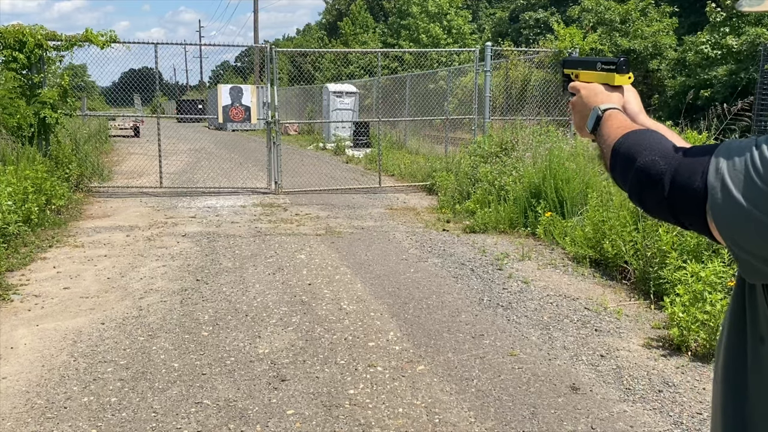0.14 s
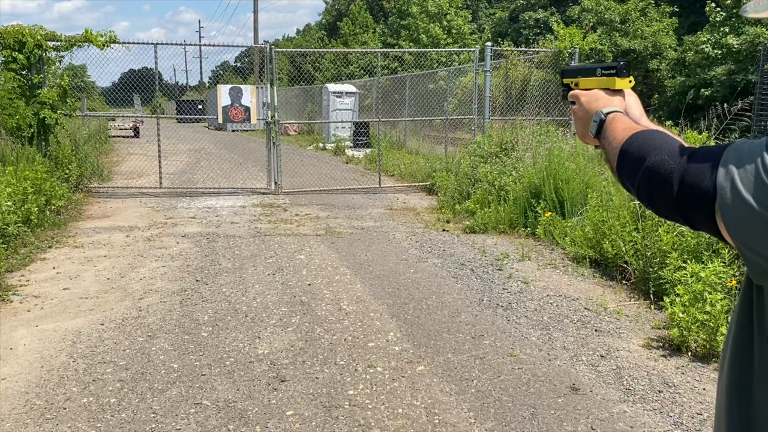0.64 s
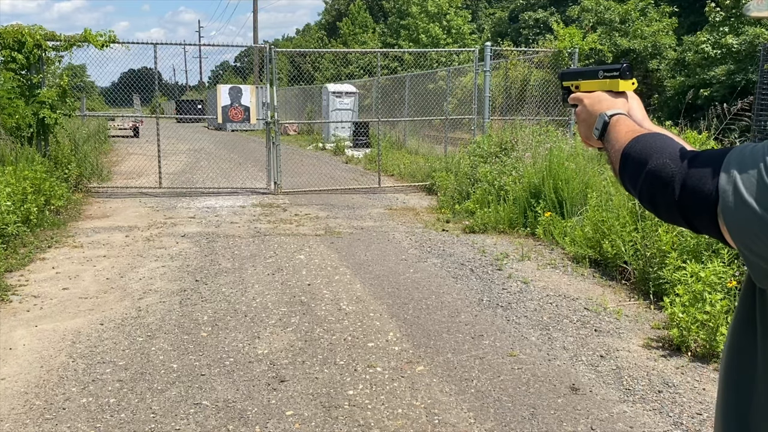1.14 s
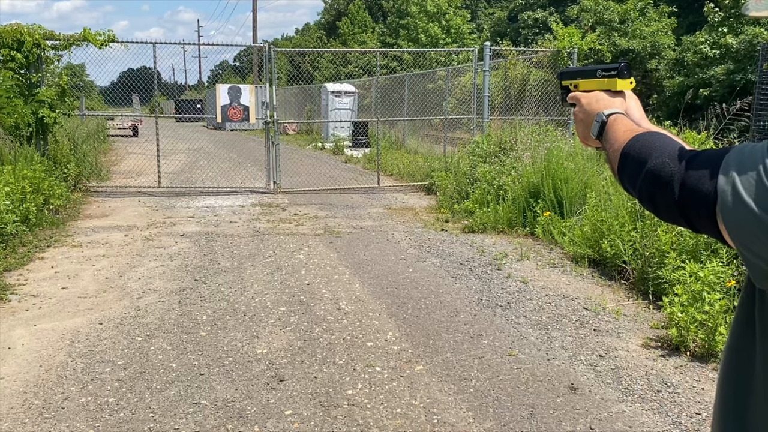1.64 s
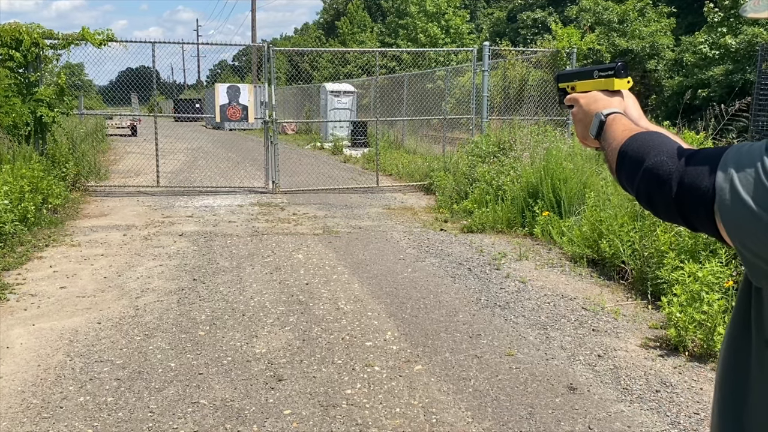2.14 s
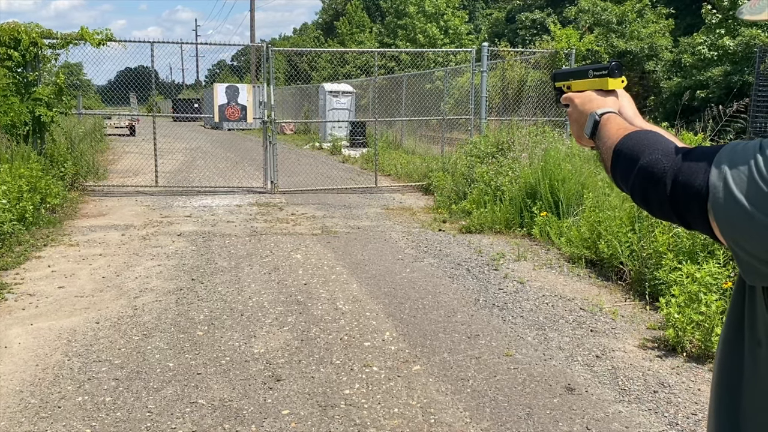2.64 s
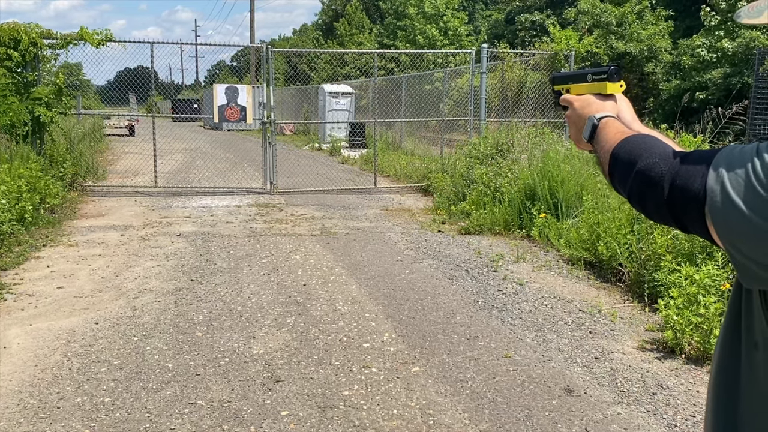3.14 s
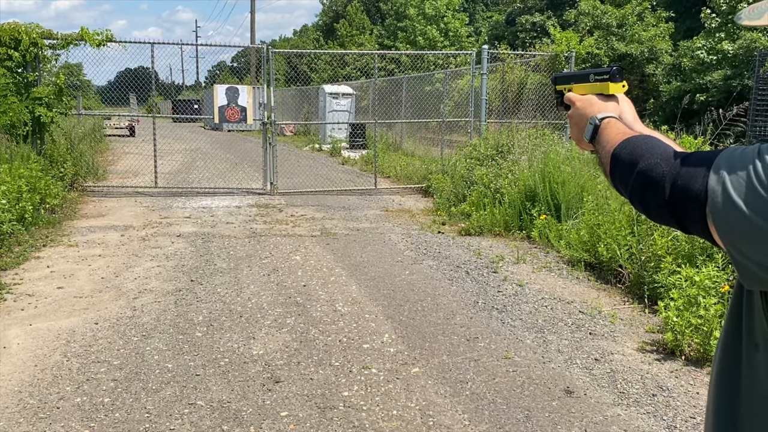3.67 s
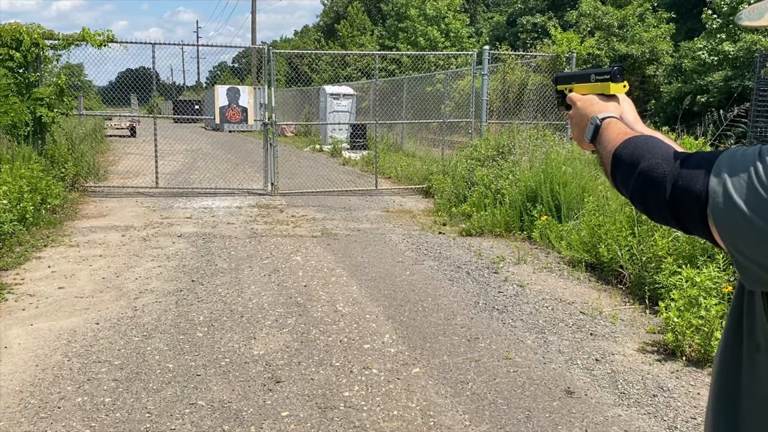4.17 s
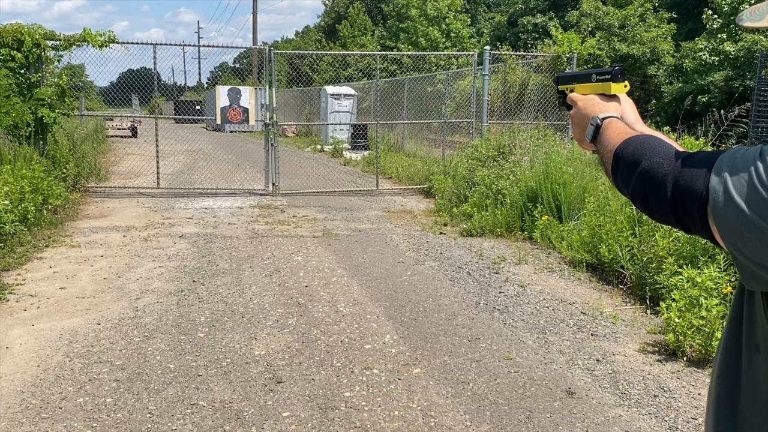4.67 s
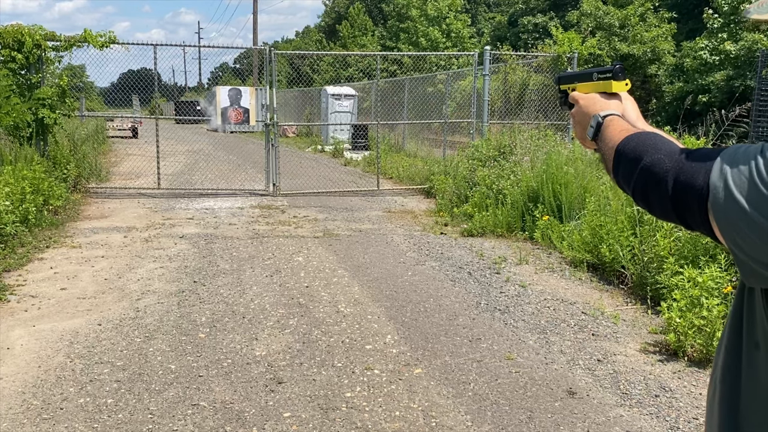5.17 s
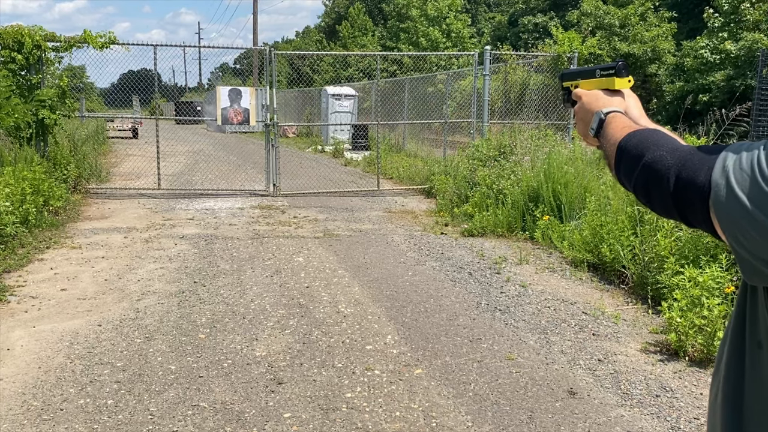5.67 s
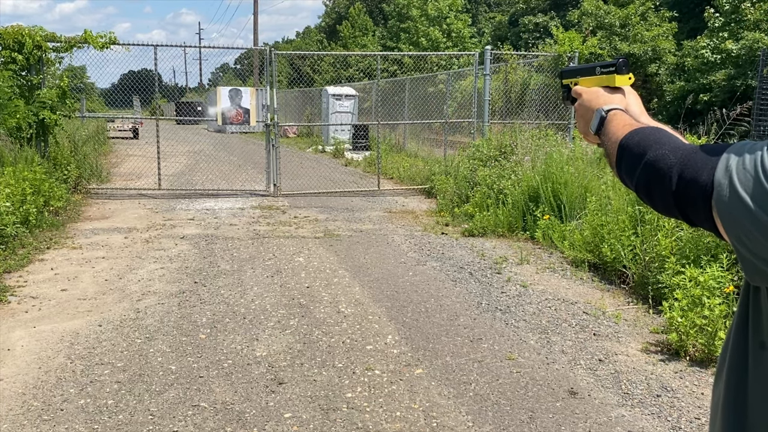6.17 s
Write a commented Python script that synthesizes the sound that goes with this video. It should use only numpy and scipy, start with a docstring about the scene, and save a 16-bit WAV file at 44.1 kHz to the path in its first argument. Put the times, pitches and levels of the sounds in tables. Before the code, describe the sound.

Birdsong over faint wind and far traffic, broken late by three loud compressed-gas pops, each ball smacking a board downrange, echoing off trees.

```python
"""An open gravel range in stereo: far road rumble, light wind on the microphone, leaves and insects are shaped noise.
Small ticks, filtered grit, dot the first seconds; gliding sines make two far bird calls, then a songbird.
A far engine's band of noise swells twice. From 4.8 s a compressed-gas launcher fires three times: hiss, knocks, gas slug.
Each ball bursts on a board downrange, cracks striking its ringing modes, about 0.14 s after its shot.
Ground, board and sheds return filtered copies of the shots; shots and hits die away in noise tails of the trees."""
import sys
import numpy as np
from scipy import signal
from scipy.fft import rfft, irfft
from scipy.io import wavfile
from scipy.ndimage import uniform_filter1d

SR = 44100
rng = np.random.default_rng(int(sys.argv[2]) if len(sys.argv) > 2 else 0)


def gain_from_db(level_db):
    """Convert decibel levels to linear amplitude factors (20 dB per decade)."""
    decades = np.asarray(level_db, float) / 20
    return 10 ** decades


def to_wav(sig):
    """Store sig (one row per channel, or 1-D mono) as 16-bit WAV at the path in sys.argv[1].

    Samples outside -1..1 are clipped; the rate is SR.
    """
    pcm = np.clip(np.atleast_2d(sig), -1, 1) * 32767
    pcm = np.round(pcm).astype(np.int16)
    wavfile.write(sys.argv[1], SR, pcm.T)  # frames by channels


N = 278129

# the launcher's shots: firing_s, level_db, bass_change_db
SHOTS = [(4.8176, -8.5, 0), (5.3871, -9, -1), (5.9153, -9, -7)]
# balls striking the board: start_s, level_db
HITS = [(4.9605, -11.5), (5.5268, -14.5), (6.0552, -17)]


def at_hz(points, hz, column=1):
    """Read one column of a table on a log-frequency axis."""
    points = np.array(points)
    return np.interp(np.log(hz + 1), np.log(points[:, 0]), points[:, column])


def in_time(rows):
    """Draw a level curve of (s, dB) points at every sample."""
    s, level_db = np.transpose(rows)
    return np.interp(np.arange(N) / SR, s, level_db)


def drift(rate):
    """Wander in straight lines between chance values of spread 1, rate of them a second (60 at most)."""
    knots = rng.standard_normal(int(N / SR * 60) + 2)
    return np.interp(np.arange(N) / SR * rate, np.arange(len(knots)), knots)


def stereo_noise(spectrum, alike, left_lag, size):
    """Coloured noise of rms 1; the part both sides share comes left_lag samples late on the left."""
    hz = np.fft.rfftfreq(size, 1 / SR)
    shared, left, right = rfft(rng.standard_normal((3, size))) * gain_from_db(at_hz(spectrum, hz))
    shared_gain, own_gain = np.sqrt(np.clip([alike, 1 - alike], 0, 1))
    late = shared * np.exp(-2j * np.pi * hz * left_lag / SR)
    x = irfft([shared_gain * late + own_gain * left, shared_gain * shared + own_gain * right], size)
    return x / np.sqrt(np.mean(x ** 2))


def ring(clicks, hz, t60):
    """A two-pole resonator: a unit click starts a sine of height 1 that falls 60 dB in t60 seconds."""
    r, w = gain_from_db(-60 / (t60 * SR)), 2 * np.pi * hz / SR
    return signal.lfilter([0, np.sin(w)], [1, -2 * r * np.cos(w), r * r], clicks + 1e-18)


def band(x, low_hz, high_hz):
    """Gentle band-pass."""
    sos = signal.butter(2, [low_hz, min(high_hz, .45 * SR)], "band", fs=SR, output="sos")
    return signal.sosfilt(sos, x)


def add(out, s, x):
    """Mix x into out from time s on."""
    i = round(s * SR)
    out[..., i:i + x.shape[-1]] += x[..., :N - i]


def convolve(x, response):
    """Pass x through an impulse response."""
    return signal.fftconvolve(np.atleast_2d(x), np.atleast_2d(response), axes=1)[:, :N]


def road():
    """Far traffic rumble: low noise, nearly the same on both sides."""
    # rumble spectrum: frequency_hz, density_db
    rumble = [(76, -47), (130, -6.5), (193, -2.5), (270, -8), (379, -8), (446, -13.5), (536, -12),
              (900, -16.5), (1150, -32.5), (1690, -43), (2860, -120)]
    return gain_from_db(-62.5 + 1.5 * drift(10)) * stereo_noise(rumble, 0.97, -18.0, size=N)


def drone():
    """A far engine: a narrow band of low noise that swells twice and flutters."""
    # engine spectrum: frequency_hz, density_db
    engine = [(200, -35), (290, -7.5), (350, 4), (430, -3.5), (600, -49)]
    # swells: centre_s, rise_db, half_length_s
    swells = [(2.08, 15, 0.33), (4.746, 11.5, 0.36)]
    t = np.arange(N) / SR
    level_db = -73.5 + 3.8 * drift(18)
    for centre_s, rise_db, half_s in swells:
        level_db += rise_db * np.exp(-((t - centre_s) / half_s) ** 2)
    return gain_from_db(level_db) * stereo_noise(engine, 0.79, -27.5, size=N)


def wind():
    """Lumpy low noise of wind on the microphone; one gust thumps the ports with a brief low sine."""
    # wind level: time_s, level_db
    strength = [(0.0, -60.5), (0.67, -57.5), (1.42, -53), (2.6, -56), (4.16, -53.5), (5.3, -50.5),
                (5.62, -62.5), (6.04, -56), (6.31, -65.5)]
    # wind spectrum: frequency_hz, density_db
    gusts = [(12, -74), (20, -33), (36, -11.5), (70, 0), (86, -1), (118, -8.5), (200, -14), (260, -26),
             (440, -120)]
    # the thump: pitch_hz, level_db, half_length_s
    buffet = (77, -31.5, 0.015)
    flow = gain_from_db(in_time(strength) + 2.56 * drift(21)) * stereo_noise(gusts, 0.88, -14.0, size=N)
    pitch_hz, level_db, half_s = buffet
    t = np.arange(N) / SR - 5.277   # s from the middle of the thump
    return flow + gain_from_db(level_db) * np.exp(-(t / half_s) ** 2) * np.sin(2 * np.pi * pitch_hz * t)


def leaves():
    """Rustle: faint noise, mostly different on the two sides."""
    # rustle spectrum: frequency_hz, density_db
    rustle = [(590, -44), (1000, 8), (1780, -4.5), (3690, -4.5), (5380, -6), (7380, -3.5), (8600, -27),
              (11200, -46), (18900, -120)]
    noise = stereo_noise(rustle, 0.12, 10.8, size=N)
    return gain_from_db(-78.5 + 2.0 * drift(5.1)) * noise * gain_from_db([[.8], [-.8]])


def insects():
    """A steady high band of noise, its level wavering slightly."""
    # chorus level: time_s, level_db
    chorus = [(0.0, -66), (1.15, -66), (1.67, -68), (4.75, -67)]
    # chorus spectrum: frequency_hz, density_db
    shrill = [(5060, -64), (8600, -24.5), (8700, -51), (8940, -14), (9950, -1.5), (10400, -2.5),
              (11600, -6.5), (12700, -9), (13200, -10), (14000, -1.5), (14900, -7.5), (16200, -18),
              (16400, -30), (16800, -54)]
    return gain_from_db(in_time(chorus) + 0.64 * drift(13)) * stereo_noise(shrill, 0.97, 8.0, size=N)


def background():
    """The place at rest; its low sounds lean right."""
    return (wind() + road() + drone()) * gain_from_db([[-1.4], [1.2]]) + leaves() + insects()


def ticks(spread_ms=1.8):
    """Small nearby clicks: decaying grit, each with its own band and side."""
    # ticks: start_s, level_db, low_hz, high_hz, left_over_right_db
    clicks = [(0.2106, -52.5, 5000, 7800, 17), (0.3994, -66, 5000, 7850, 1.5),
              (0.488, -64, 1200, 3500, -1.5), (0.5397, -63.5, 1100, 2400, -0.4),
              (0.653, -62, 1300, 7000, 0.1), (0.8047, -59, 1100, 3200, -1.5),
              (1.479, -52.5, 1100, 4670, -3), (1.558, -55, 1490, 7500, 0.1), (1.6034, -61, 1200, 3280, 1),
              (1.8028, -56.5, 990, 4180, -3), (1.964, -67.5, 1300, 3500, 0),
              (3.266, -53.5, 3000, 7800, -0.4), (3.383, -63, 1100, 2000, .1)]
    out = np.zeros((2, N))
    fade = np.exp(-np.arange(600) / (spread_ms * SR / 1000))
    for s, level_db, low_hz, high_hz, pan_db in clicks:
        grit = rng.standard_normal(600) * fade
        tick = band(band(grit, low_hz, high_hz), low_hz, high_hz)
        sides_db = np.array([[pan_db / 2], [-pan_db / 2]])
        add(out, s, gain_from_db(level_db + sides_db) * tick / np.abs(tick).max())
    return out


def bird_notes():
    """List every note as start_s, length_s, from_hz, to_hz, warble_depth_hz, level_db."""
    # notes of each syllable: offset_s, length_s, from_hz, to_hz, warble_depth_hz, level_db
    syllables = {"pickup": [(0, .05, 7300, 6650, 40, -2.5)], "buzz": [(0, 0.033, 4880, 5270, 60, -2.5),
                 (.034, 0.048, 5340, 5000, 557, -5.5), (.107, .058, 7400, 6400, 40, -6)],
                 "swoop": [(0, .047, 5370, 5720, 500, -0.5), (.041, .031, 3114, 3026, 40, -9.5),
                 (.096, .064, 4350, 3480, 90, 0)], "vee": [(0, .05, 3720, 3440, 40, -9),
                 (.057, .03, 6250, 4550, 40, -2), (.086, .045, 4520, 5810, 40, -2)],
                 "trill": [(0, .025, 6650, 6920, 90, -6.5), (.038, 0.023, 3705, 5060, 150, -1),
                 (.052, 0.031, 5150, 5330, 80, -0.5)]}
    # lines of the song, one syllable at a steady pace: syllable, first_s, pace_s, repeats
    song = [("pickup", 2.474, .22, 1), ("buzz", 2.595, .22, 2), ("swoop", 3.036, .236, 3),
            ("vee", 3.764, .195, 2), ("trill", 4.162, .147, 4)]
    # loudness of each line: level_db, change_per_repeat_db
    song_db = [(-72, 0), (-65, 3.0), (-65.5, 0.2), (-61.5, 0.5), (-64, -1.3)]
    # other birds: start_s, length_s, from_hz, to_hz, level_db
    far_calls = [(0.261, 0.067, 2600, 2570, -76.5), (0.867, 0.11, 3840, 3694, -80)]
    notes = [(s, length, from_hz, to_hz, 0, db) for s, length, from_hz, to_hz, db in far_calls]
    for (name, first_s, pace_s, repeats), (line_db, change_db) in zip(song, song_db):
        for k in range(repeats):
            for offset_s, length, from_hz, to_hz, warble_hz, note_db in syllables[name]:
                start_s = first_s + pace_s * k + offset_s
                notes.append((start_s, length, from_hz, to_hz, warble_hz, line_db + change_db * k + note_db))
    return notes


def bird(warble_per_s=110, wet_db=-0.2, t60=0.88, fall_bend=1.4, rise_bend=2.5):
    """Gliding whistles, some warbled fast, far off and smeared by the wood's decaying noise response."""
    out = np.zeros(N)
    for s, length, from_hz, to_hz, warble_hz, level_db in bird_notes():
        u = np.linspace(0, 1, round(length * SR))
        bend = fall_bend if from_hz > to_hz else rise_bend
        hz = to_hz + (from_hz - to_hz) * (1 - u) ** bend
        hz += warble_hz * np.sin(2 * np.pi * warble_per_s * length * u)
        whistle = np.sin(np.pi * u) ** 0.067 * np.sin(2 * np.pi * np.cumsum(hz) / SR)
        add(out, s, gain_from_db(level_db) * whistle)
    out *= gain_from_db(1.8 * drift(58))   # air turbulence on the long path
    wood = rng.standard_normal((2, SR // 2)) * gain_from_db(-60 * np.arange(SR // 2) / SR / t60)
    wet = gain_from_db(wet_db) * convolve(out, wood / np.linalg.norm(wood[0]))
    return .48 * out + wet


def bangs(hit_db=7.0):
    """From far off every shot and hit is a single click."""
    out = np.zeros(N)
    for s, level_db in [row[:2] for row in SHOTS] + [(s, db + hit_db) for s, db in HITS]:
        out[round(s * SR)] = gain_from_db(level_db)
    return out


def trees(x, alike_hz=700, gap_ms=1.0, far_onset_s=0.1):
    """Near brush answers at once and fades fast; the far tree line swells late and lingers."""
    # scattering: frequency_hz, near_db, near_t60_s, far_db, far_t60_s
    scattering = [(120, -33, 0.13, -35, 1.2), (302, -15, 0.1, -27, 1.65), (685, -15.5, 0.18, -20.5, 1.56),
                  (1100, -15, 0.09, -30, 1.6), (1550, -22.5, 0.23, -24.5, 1.49),
                  (3000, -21, 0.32, -22.5, 1.13), (6100, -16, 0.18, -24.5, 1.05),
                  (8670, -30, 0.43, -44.5, 1.7), (11000, -27, 0.31, -50, 1.1), (13300, -46, 0.25, -60, .5),
                  (15140, -43, .12, -48, 0.71)]
    t, response = np.arange(SR) / SR, 0
    for low_hz in 70 * 2 ** np.arange(0, 8, .5):   # half-octave bands
        hz = low_hz * 2 ** .25
        near_db, near_t60, far_db, far_t60 = (at_hz(scattering, hz, column=k) for k in range(1, 5))
        near = gain_from_db(near_db - 60 * t / near_t60) * (t > gap_ms / 1000)
        far = gain_from_db(far_db - 60 * t / far_t60) * (1 - np.exp(-(t / far_onset_s) ** 2))
        shared, left, right = rng.standard_normal((3, SR))
        alike = 1 / (1 + (hz / alike_hz) ** 2)   # lows match between the sides, highs differ
        noise = np.sqrt(alike) * shared + np.sqrt(1 - alike) * np.array([left, right])
        clumps = np.interp(t * 60, np.arange(61), rng.standard_normal(61))   # stands answer unevenly
        response = response + band(noise, low_hz, low_hz * np.sqrt(2)) * np.hypot(near, far) * gain_from_db(3 * clumps)
    grain = np.repeat(rng.standard_normal(SR // 100 + 1), repeats=100)[:SR]   # single trunks stand out
    return convolve(x, response * gain_from_db(2.2 * grain))


def echoes(shots):
    """Each surface returns a smeared copy of the shot in a band of its own."""
    # delays from fence, post, board and two sheds: delay_ms
    delays = [57, 93, 133.2, 213.5, 295.5]
    # the same surfaces: level_db, low_cut_hz, high_cut_hz, smear_ms
    surfaces = [(-18.5, 600, 4100, 4.6), (-35, 1600, 3100, 1.2), (-22, 1000, 1970, 0.84),
                (-22, 190, 940, 1.35), (-23.5, 235, 790, 2.5)]
    response = np.zeros((2, SR // 2))
    for delay_ms, (level_db, low_hz, high_hz, smear_ms) in zip(delays, surfaces):
        fade = np.exp(-np.arange(1500) / (smear_ms * SR / 1000))
        facets = (rng.standard_normal(1500) + 0.41 * rng.standard_normal((2, 1500))) * fade
        copy = band(facets / np.linalg.norm(facets[0]), low_hz, high_hz)
        add(response, delay_ms / 1000, gain_from_db(level_db) * copy)
    return convolve(shots.mean(axis=0), response)


def board(burst_ms=0.86, level_db=2.5, snap_db=-1, snap_ms=0.46):
    """The shell breaks in a short run of cracks that strike every mode of the board anew; a broad snap leads."""
    # modes of the board: pitch_hz, level_db, t60_s
    modes = [(230, -14, 0.05), (311, -8, 0.044), (500, -10, 0.015), (747, -3.5, 0.024), (820, -10, 0.037),
             (1370, -1.5, 0.021), (1614, 1, 0.012), (2240, 1, 0.0017), (2600, -0.5, 0.013),
             (3090, 3, 0.0061), (3595, 10.5, 0.014), (4350, 4, 0.0076), (5000, 4, .006), (6145, 12, 0.003),
             (7000, 6, 0.011), (10400, -5, 0.003)]
    out, ms = np.zeros(N), np.arange(400) / SR * 1000
    for hz, mode_db, t60 in modes:
        cracks = np.zeros(N)
        fade = ms * np.exp(-ms / burst_ms * (hz / 2000) ** 0.31)   # shorter for higher modes
        for s, hit_db in HITS:
            run = rng.standard_normal(400) * (rng.random(400) < .25) * fade
            # even out how hard this chance run drives the mode
            drive = np.abs(run @ np.exp(2j * np.pi * hz * ms / 1000))
            run /= np.hypot(drive, np.linalg.norm(run) / 2)
            add(cracks, s, gain_from_db(hit_db + mode_db + level_db) * run)
        out += ring(cracks, hz, t60)
    for s, hit_db in HITS:
        snap = band(rng.standard_normal(400) * np.exp(-ms / snap_ms), 1400, 10700)
        add(out, s, gain_from_db(hit_db + snap_db) * snap)
    right = np.roll(out, shift=4)   # the left port hears it first
    return np.array([out, right - .6 * band(right, 3000, 8500)])   # the right is shaded in the upper mids


def gas_slug(ms):
    """Gas bursts from the muzzle; its pressure swing slows as it spreads, over one slow afterswing."""
    # gas slug: after_firing_ms, swings, slowing_ms, length_ms, rise_ms
    blast = (4.0, 1.45, 5.7, 8.0, .16)
    # slow pressure swing: pitch_hz, level_db, t60_s
    afterswing = (33, -15.5, .1)
    start_ms, swings, slow_ms, length_ms, rise_ms = blast
    after = np.maximum(ms - start_ms, 0)
    swing = np.cos(2 * np.pi * swings * np.tanh(after / slow_ms))
    slug = swing * np.exp(-(after / length_ms) ** 2) * (1 - np.exp(-after / rise_ms))
    hz, slow_db, t60 = afterswing
    return gain_from_db(-3.5) * slug - gain_from_db(slow_db) * ring(np.diff(ms > start_ms, prepend=0), hz, t60)


def valve_hiss(ms, jet_db=-6, barrel_hiss_db=-18, rise_ms=.55, fall_ms=.8, barrel_ms=7.0):
    """Noise of the valve jet: a sharp puff about the moment of firing, then a longer hiss in the barrel."""
    # jet spectrum: frequency_hz, density_db
    jet = [(600, -7.5), (2000, -2.5), (4500, 2.5), (8000, -5), (11000, -4), (13300, -4.5), (15000, 0.5),
           (16500, -27.5)]
    puff = np.exp(np.where(ms < 0, ms / rise_ms, -ms / fall_ms))
    barrel = (ms > 0) * np.exp(-np.abs(ms) / barrel_ms)
    level = gain_from_db(jet_db) * puff + gain_from_db(barrel_hiss_db) * barrel
    return level * stereo_noise(jet, 0.83, 0.98, size=4096)


def action_knocks(ms):
    """Parts inside the launcher knock as it cycles, each ringing at its own pitch."""
    # knocks: after_firing_ms, pitch_hz, level_db, t60_ms
    knocks = [(0.96, 1700, -1.5, 8.4), (1.38, 1900, -1.5, 1.8), (3, 1550, -1, 2.15), (0.6, 3560, -7.5, 7.7),
              (1.47, 4260, -1.5, 2.4), (1.9, 6400, -3, 2.3), (4, 486, 0.5, 11.2), (0.64, 920, -8.5, 7),
              (-2.5, 810, -17.5, 6.2)]
    out = np.zeros(len(ms))
    for at_ms, hz, level_db, t60_ms in knocks:
        click = np.diff(ms > at_ms, prepend=0)
        out += gain_from_db(level_db + rng.normal(0, 0.14)) * ring(click, hz, t60_ms / 1000)
    return out


def launcher(level_db=5.5):
    """Each shot sums valve hiss, knocks of the action and the gas slug, with its own weight of bass."""
    out, lead_s = np.zeros((2, N)), .004
    ms = (np.arange(4096) / SR - lead_s) * 1000   # time from firing
    slug = gas_slug(ms)
    for s, shot_db, bass_db in SHOTS:
        shot = slug + valve_hiss(ms) + action_knocks(ms)
        shot += (gain_from_db(bass_db) - 1) * band(shot, 20, 135)
        add(out, s - lead_s, gain_from_db(shot_db + level_db) * shot)
    return out


def ground_bounce(shots):
    """The gravel returns the shot 5.7 ms late, 6 dB down and without its lows."""
    return gain_from_db(-6) * np.roll(band(shots, 530, 18000), round(5.7 * SR / 1000), axis=1)


def scene():
    """Launcher with its lows to the right and highs to the left, board to the left, and the place around them."""
    shots = launcher()
    near = shots + ground_bounce(shots)
    low = signal.sosfilt(signal.butter(1, 2200, fs=SR, output="sos"), near)
    # the left port is shaded in the lows
    direct = low * gain_from_db([[-2.2], [1.6]]) + (near - low) * gain_from_db([[1.5], [-.8]])
    return direct + board() + echoes(shots) + trees(bangs()) + bird() + ticks() + background()


def roll_off(x):
    """The treble ends steeply here."""
    return signal.sosfilt(signal.butter(12, 16990, fs=SR, output="sos"), x)


def record(dry, knee_db=-30, share=0.084, release_db_per_s=3.5, top=0.85):
    """Gain control backs off at loud peaks by a share of their excess and creeps back; peaks are rounded."""
    peak_db = 20 * np.log10(np.abs(dry).max(axis=0) + 1e-9)
    over = share * np.maximum(peak_db - knee_db, 0)
    ramp = release_db_per_s * np.arange(N) / SR
    held_db = np.maximum.accumulate(over + ramp) - ramp   # falls no faster than the release
    cut_db = uniform_filter1d(held_db, size=221)   # eased over 5 ms
    mix = top * np.tanh(dry * gain_from_db(-cut_db) / top)
    return roll_off(mix)


dry = scene()
out = record(dry)
to_wav(out)
```